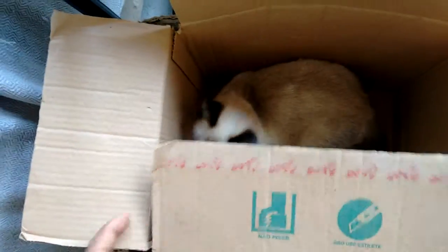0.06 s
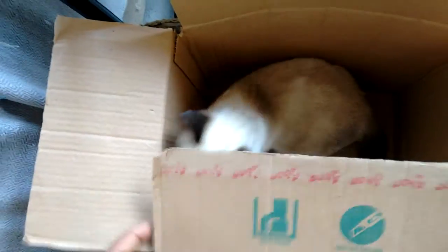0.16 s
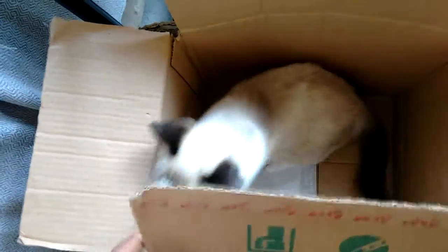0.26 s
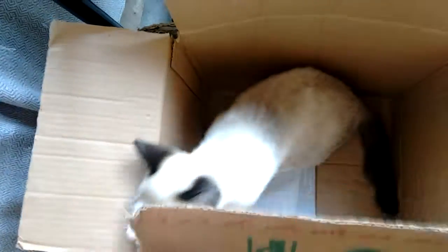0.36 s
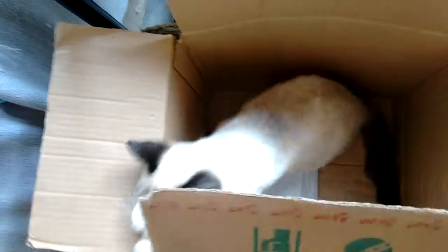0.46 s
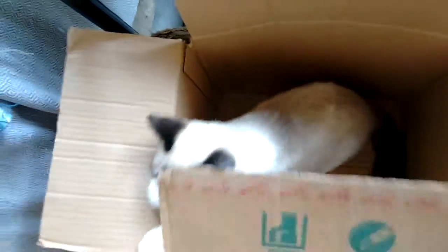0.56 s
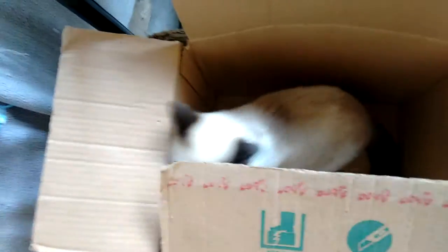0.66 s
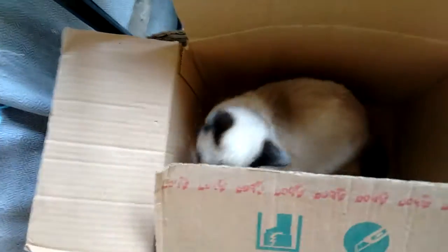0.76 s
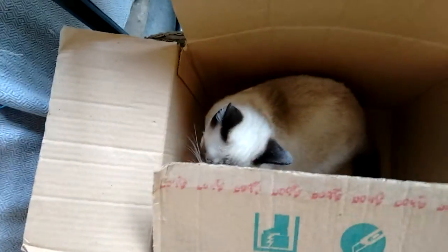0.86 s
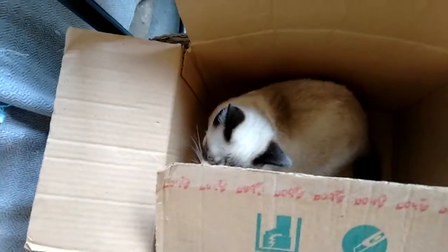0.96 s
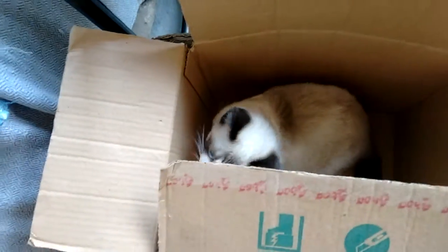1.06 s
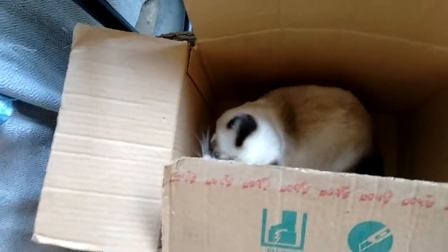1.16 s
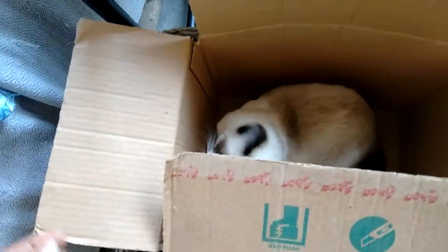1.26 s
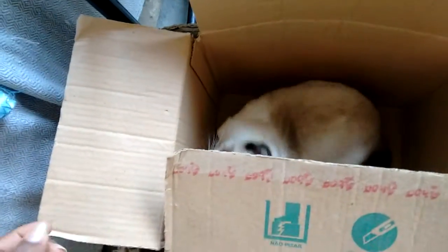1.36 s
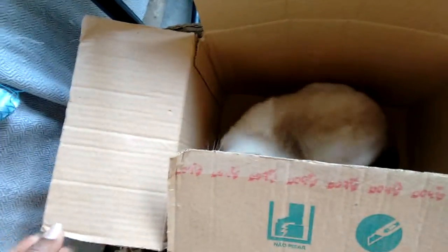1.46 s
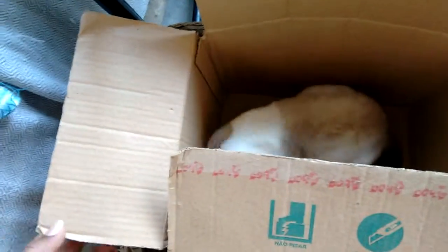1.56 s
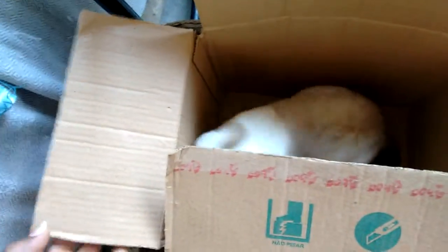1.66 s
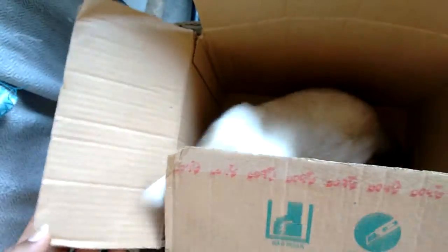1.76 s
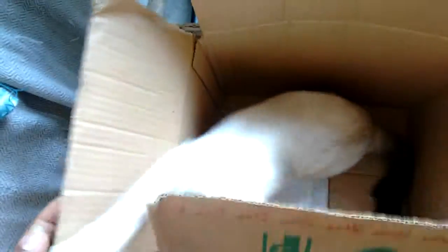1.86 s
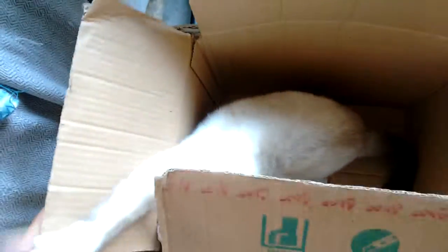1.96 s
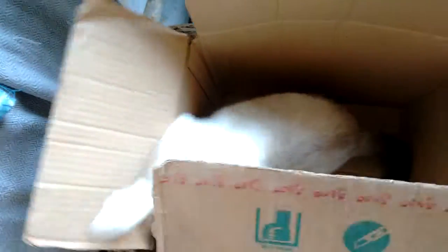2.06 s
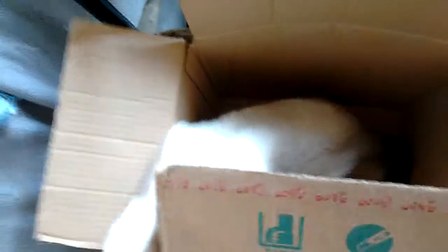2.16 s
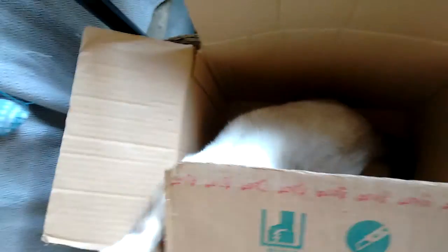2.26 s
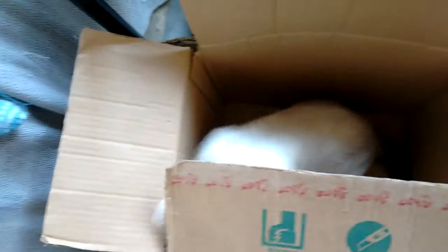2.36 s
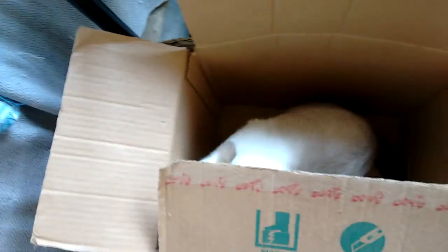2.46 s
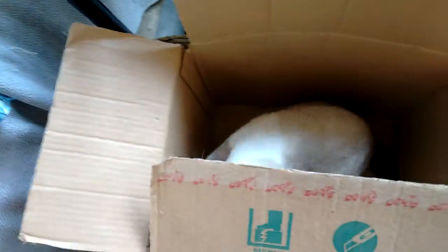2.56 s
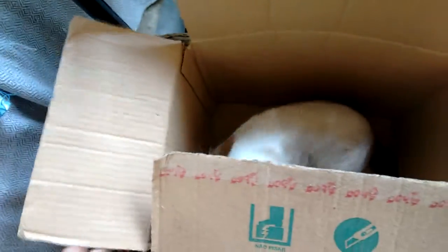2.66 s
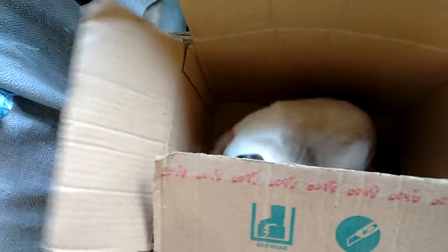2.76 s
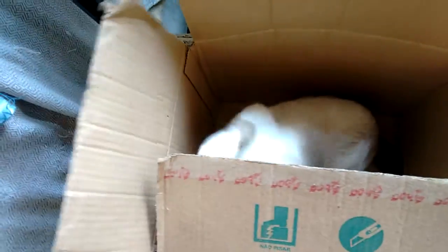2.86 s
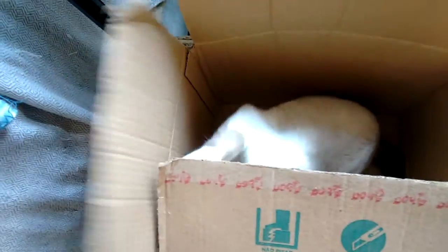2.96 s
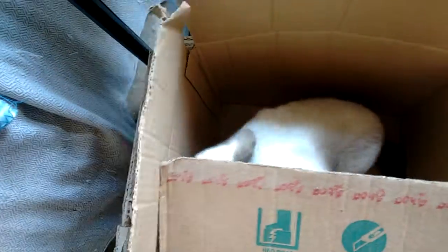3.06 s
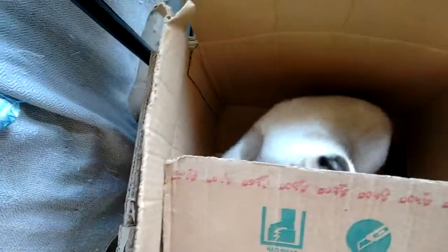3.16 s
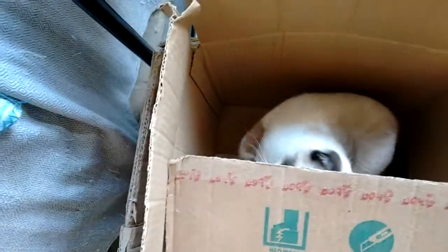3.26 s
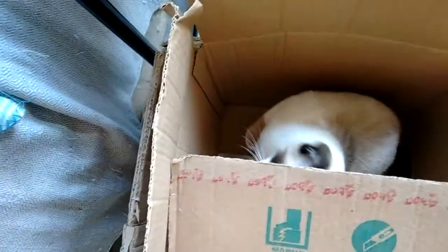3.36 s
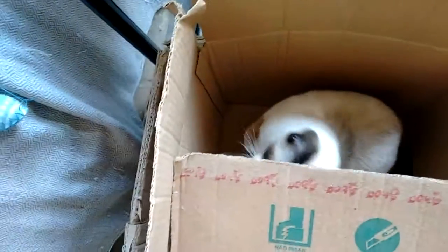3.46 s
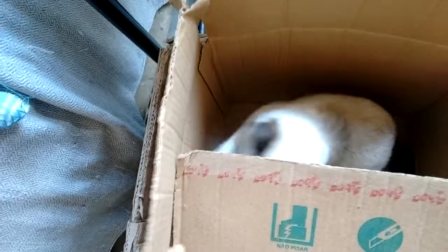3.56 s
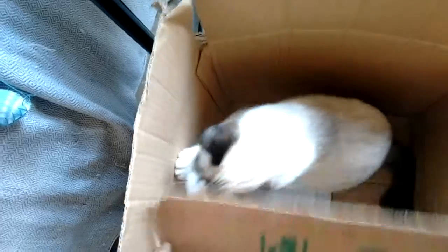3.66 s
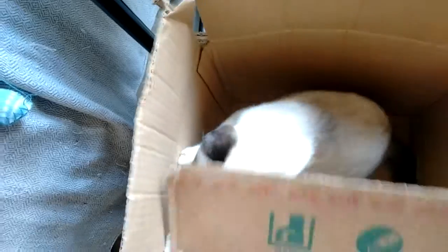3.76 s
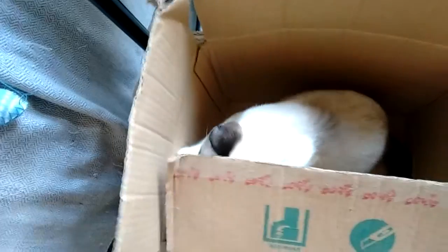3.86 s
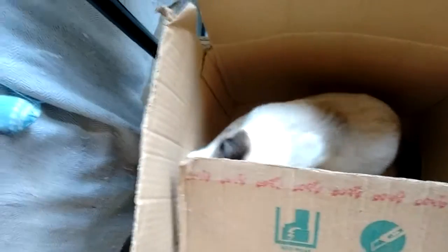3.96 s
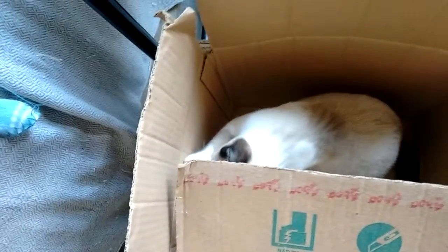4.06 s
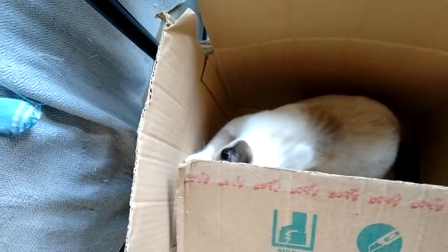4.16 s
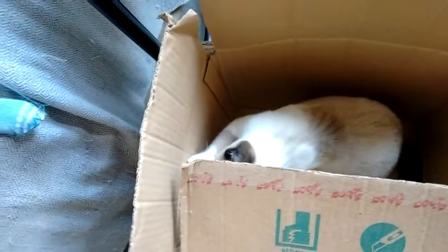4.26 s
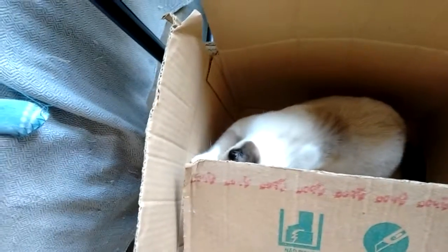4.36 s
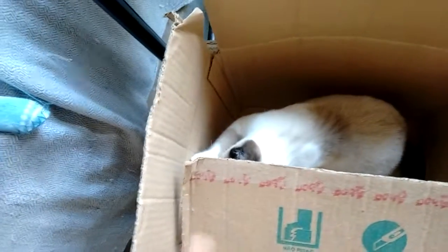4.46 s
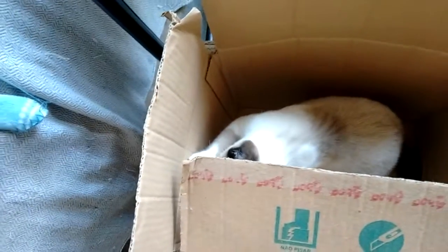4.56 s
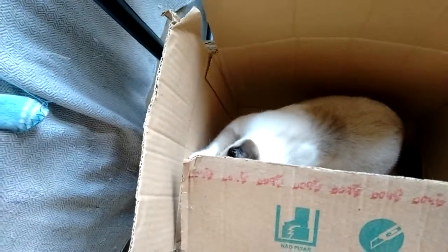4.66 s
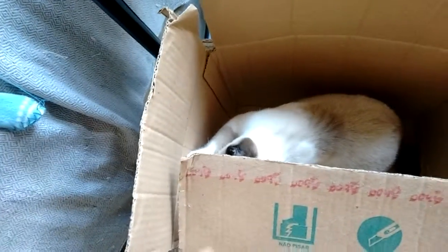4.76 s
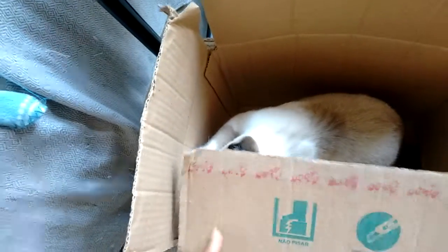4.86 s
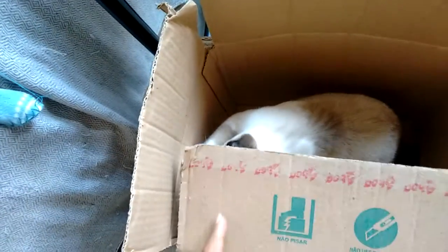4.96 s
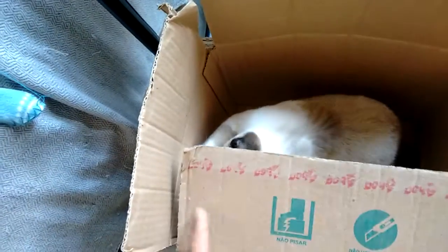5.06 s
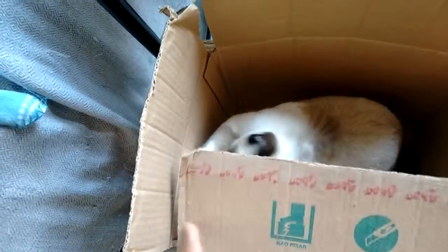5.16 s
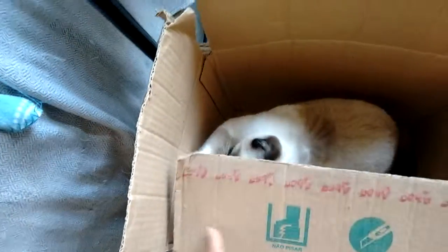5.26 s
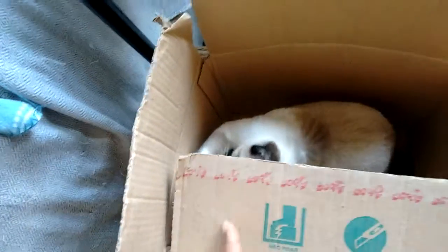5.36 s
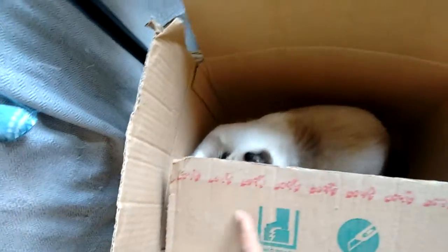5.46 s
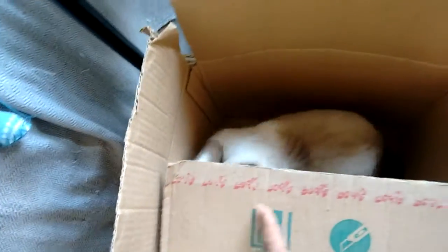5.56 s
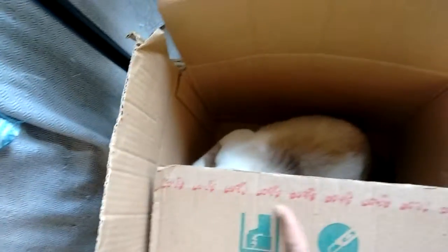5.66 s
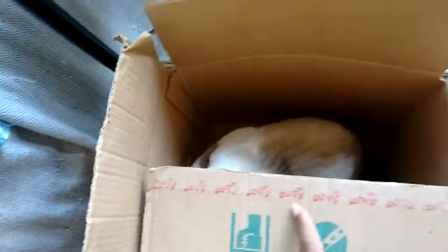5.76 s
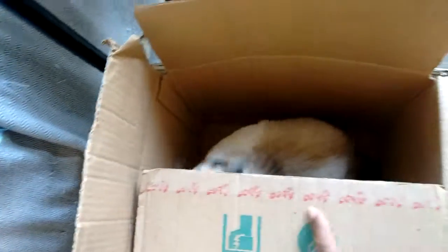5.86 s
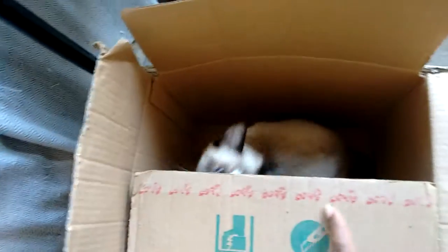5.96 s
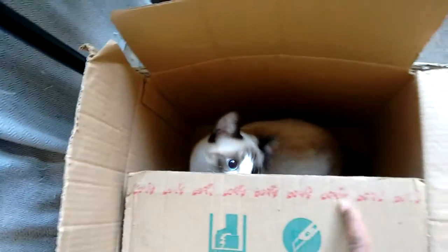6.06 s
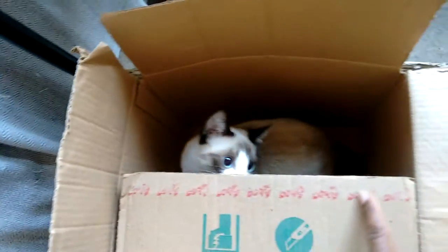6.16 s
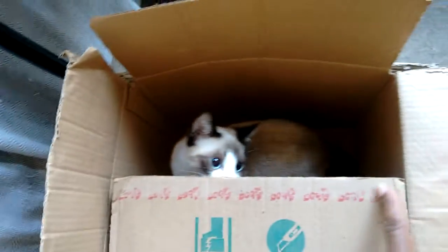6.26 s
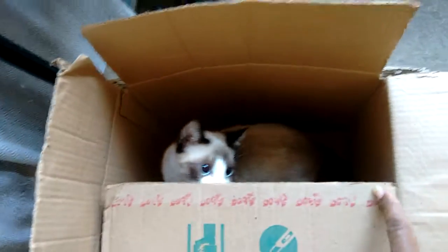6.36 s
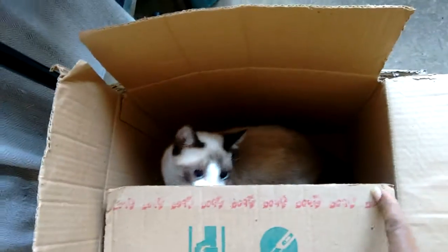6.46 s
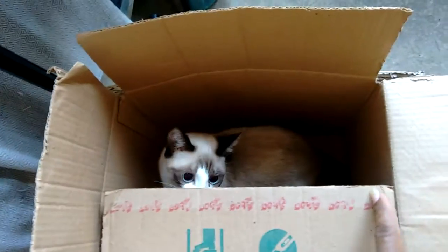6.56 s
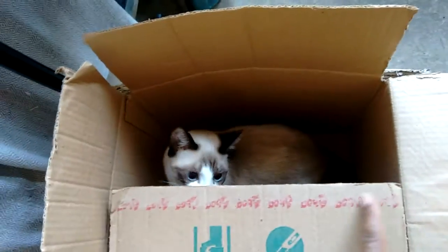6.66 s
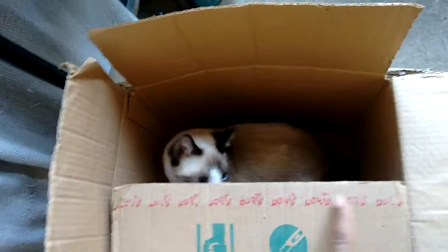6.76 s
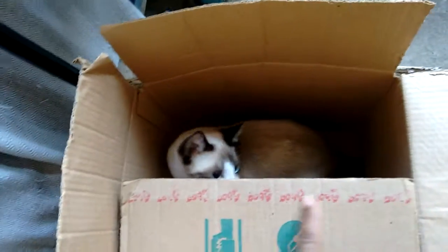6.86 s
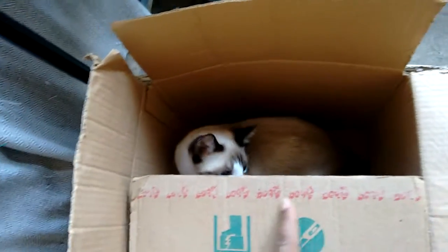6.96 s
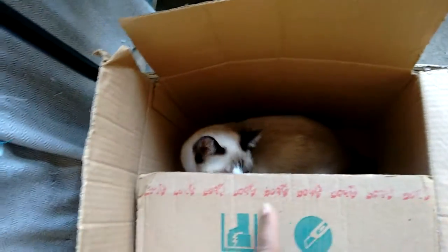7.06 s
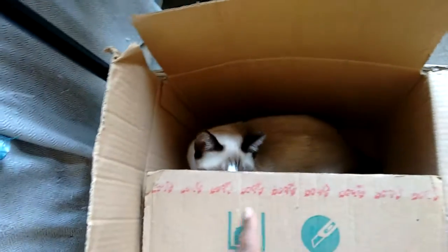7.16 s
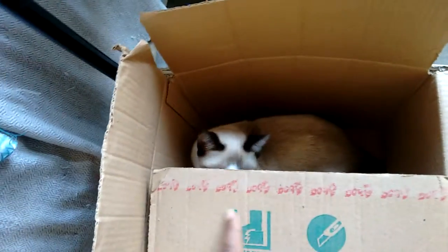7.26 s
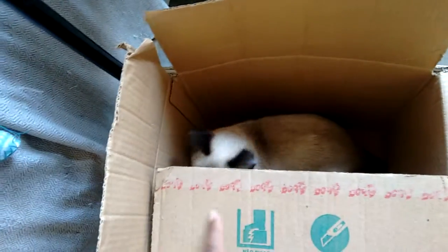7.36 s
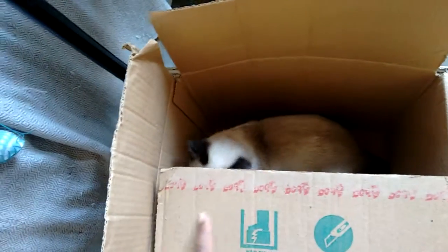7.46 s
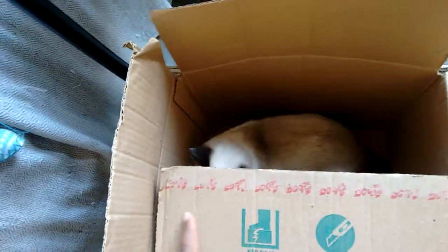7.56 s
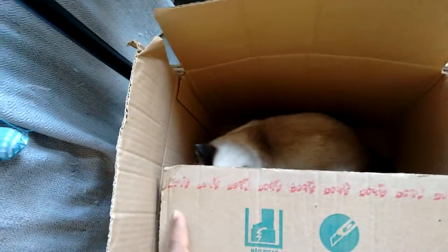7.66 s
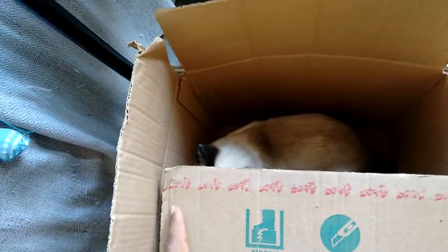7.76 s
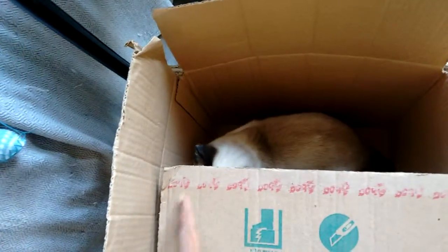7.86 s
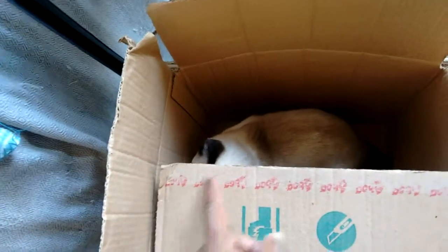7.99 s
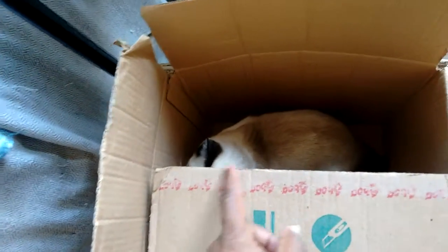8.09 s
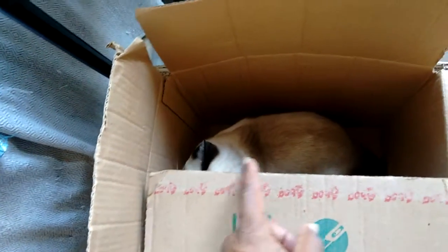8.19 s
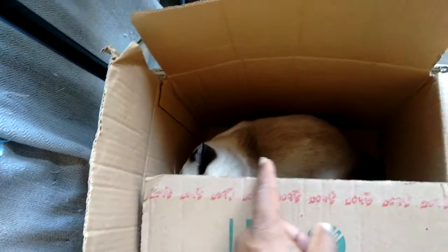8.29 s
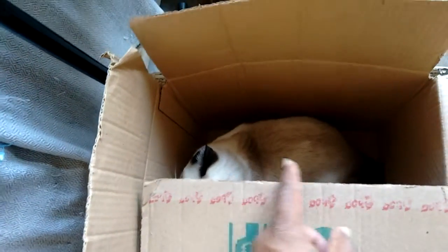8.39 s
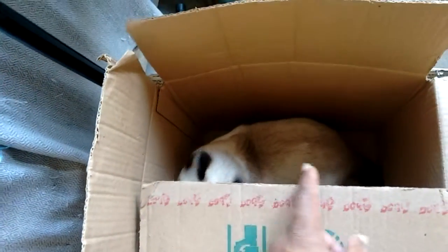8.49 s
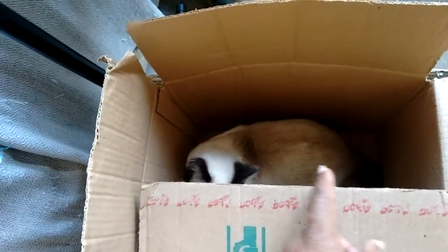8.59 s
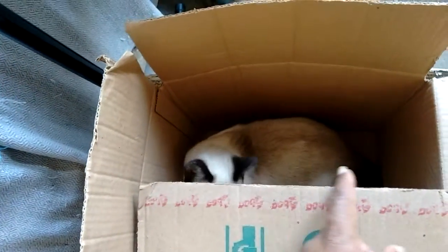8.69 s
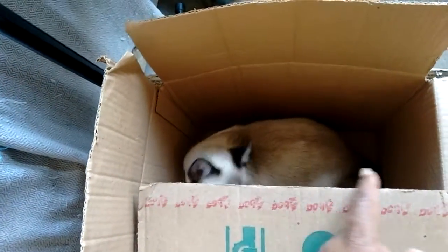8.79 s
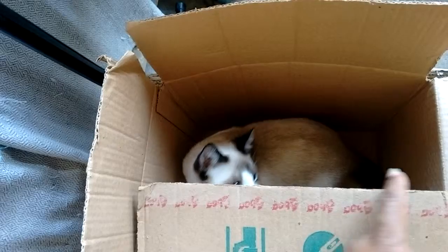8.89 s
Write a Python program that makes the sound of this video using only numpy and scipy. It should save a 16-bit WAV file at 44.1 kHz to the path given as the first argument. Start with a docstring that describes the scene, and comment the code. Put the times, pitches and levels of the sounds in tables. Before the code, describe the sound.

Faint room tone and a bird chirp open the scene, with quick boxy bumps as a cat moves in a cardboard box. Scattered paw scuffs and thumps continue, then a lull. A finger lands on the flap with rapid scratchy flicks, then rubs in long rasping strokes with little ticks and snaps, fading to a light rub under thin bird whistles. Heard very near.

```python
"""Over faint room tone, birds call from the start: gliding, trembling sines with an outdoor echo.
Until 4.6 s a cat scuffs and paws in an open cardboard box: friction and blows ring its modes.
From 4.9 s a fingertip lands and flicks; from 5.3 s it drags along a flap, catching and jerking free.
Corrugation ridges and plucked fibres roughen the rub; thin whistles return near the end.
A hand-held two-port microphone hears it from close by."""
import sys
import numpy as np
from scipy import signal
from scipy.fft import rfft, irfft
from scipy.io import wavfile
from scipy.ndimage import uniform_filter1d

SR = 44100
rng = np.random.default_rng(int(sys.argv[2]) if len(sys.argv) > 2 else 0)


def file_out(sig):
    """Save sig as 16-bit WAV at sys.argv[1]."""
    # one column per channel
    cols = np.atleast_2d(sig).T
    # limit, then scale
    lim = np.clip(cols, -1, 1)
    pcm = np.round(lim * 32767).astype(np.int16)
    wavfile.write(sys.argv[1], SR, pcm)


N = 393813  # samples

# room tone spectrum [f/Hz, relative density/dB per Hz]
ROOM_TONE = [(20, -20.5), (63, -4), (100, -15), (700, -6.5), (1100, -10), (1900, -18.5), (2800, -20.5),
             (4200, -18.5), (5000, -24.5), (8000, -23), (12000, -32), (15700, -35)]
# single notes and far thin whistles [t/s, length/s, from f/Hz, to f/Hz, level/dB]
WHISTLES = [(0, .025, 3000, 2980, -47), (.02, .055, 3120, 3060, -54), (.04, .03, 1970, 1950, -52),
            (6.405, .022, 2550, 2430, -50), (.74, .08, 4200, 4050, -64), (.82, .12, 4480, 4420, -65),
            (.93, .13, 4400, 4050, -65), (1.1, 0.1, 3070, 3090, -61), (1.36, .24, 4100, 3500, -63),
            (3.2, .1, 3420, 3410, -66), (3.37, .05, 4220, 4050, -64), (3.425, .065, 4000, 3930, -63),
            (8.6, .06, 4070, 4030, -65), (8.655, .08, 4020, 3620, -61), (8.655, .06, 4200, 4350, -62),
            (8.74, .11, 4290, 4160, -63)]
# near bird's phrase [t into phrase/s, length/s, from f/Hz, to f/Hz, level before phrase level/dB]
WARBLES = [(.02, 0.046, 2773, 3150, -54.5), (.035, 0.048, 3920, 3900, -53.5), (.07, 0.063, 2520, 2150, -42),
           (.065, 0.074, 2030, 2136, -50), (.115, 0.0288, 3850, 3240, -49),
           (.118, 0.048, 3200, 2960, -49.5), (.13, 0.03, 2490, 2400, -43), (.145, 0.069, 1667, 2000, -53.5),
           (0.182, 0.026, 2430, 2480, -39), (0.203, 0.025, 3027, 2933, -45.5),
           (.21, 0.067, 2544, 2260, -39.5), (.215, 0.071, 2720, 2530, -48.5), (.17, .07, 2050, 1970, -59)]
# phrase starts; a start before 0 leaves only the phrase's end [t/s, level/dB]
PHRASE_STARTS = [(-0.198, -5), (1.69, 3), (6.395, 1)]
# fur and paws scuffing the walls [t/s, length/s, hiss level/dB, hollow level/dB, panel level/dB]
SCUFFS = [(.05, 0.11, -54, -37, -43), (.18, 0.034, -45, -35.5, -38), (.25, 0.068, -42.5, -31.5, -50),
          (.385, 0.033, -47, -40, -43.5), (.46, 0.25, -58, -63, -83), (.65, 0.032, -51, -67, -83),
          (.72, 0.17, -62, -71, -91), (1.515, 0.034, -56.5, -41, -44), (1.75, 0.13, -55.5, -45, -71),
          (1.85, 0.049, -50, -42.5, -51), (1.91, 0.068, -58, -43, -48.5), (1.96, 0.15, -46, -45.5, -46.5),
          (2.12, 0.078, -59.5, -64, -63), (2.205, 0.072, -51, -50, -52.5), (2.3, 0.13, -56, -50, -75),
          (2.385, 0.11, -51, -51, -57), (2.515, 0.044, -49, -66, -47), (2.58, 0.078, -64, -64, -57),
          (2.73, 0.08, -47.5, -45.5, -47.5), (2.83, .2, -50.5, -59, -82), (3.075, 0.072, -62, -40, -48),
          (3.15, 0.076, -56, -59, -63), (3.53, 0.049, -54.5, -41.5, -55), (3.63, 0.091, -42.5, -42.5, -41),
          (3.74, 0.065, -46, -39.5, -36.5), (3.865, 0.061, -49.5, -46, -55), (4.0, 0.14, -55.5, -61, -66),
          (4.4, 0.22, -61, -65, -64)]
# fingertip landing and flicking [t/s, length/s, hiss level/dB, hollow level/dB, panel level/dB]
FLICKS = [(4.908, 0.068, -61, -32, -44), (4.975, 0.078, -56, -34.5, -33), (5.065, 0.083, -49.5, -28.5, -35),
          (5.15, 0.055, -46.5, -36.5, -39), (5.22, 0.056, -59.5, -35.5, -44),
          (5.265, 0.035, -48.5, -37, -36)]
# long drags, one sub-table each [t/s, hiss level/dB, hollow level/dB, panel level/dB, flute level/dB]
DRAGS = [
    [(5.345, -65, -26, -47, -51), (5.351, -54, -40.5, -44, -42.5), (5.531, -48, -33.5, -28.5, -35.5),
     (5.561, -43.5, -37.5, -31, -40), (5.751, -43, -42, -34, -39), (5.837, -48, -49, -37.5, -46.5),
     (5.899, -44.5, -39, -34, -43), (6.087, -49, -48.5, -41.5, -46.5), (6.181, -43.5, -39, -39.5, -41.5),
     (6.373, -50.5, -35, -40.5, -51), (6.43, -74, -80, -98, -53)],
    [(6.66, -73, -53, -60, -66), (6.682, -68, -36, -43.5, -69), (6.706, -55.5, -36.5, -32, -50.5),
     (6.824, -48, -32.5, -33.5, -37), (6.862, -45, -31.5, -31, -36), (6.966, -43, -32, -32, -35),
     (7.104, -48, -36, -27, -35), (7.438, -50.5, -35.5, -27.5, -38.5), (7.698, -52.5, -31, -33, -36.5),
     (7.818, -60, -37.5, -53, -61), (7.87, -66, -55, -45, -58)],
    [(7.88, -78, -43, -45, -58), (7.914, -48.5, -39.5, -40, -49), (7.964, -43, -40.5, -36, -39.5),
     (8.142, -48, -34, -38, -43.5), (8.2, -53, -45.5, -49.5, -55), (8.39, -53.5, -53, -49.5, -53.5),
     (8.564, -55.5, -61, -57, -75), (8.8, -57.5, -44.5, -54, -75), (8.93, -58, -60, -69, -72)],
]
# narrow hollow scrape along a flap edge [t/s, length/s, level/dB]
RASPS = [(2.36, 0.31, -48.5), (2.73, 0.069, -53), (8.1, 0.058, -32), (8.19, 0.29, -52)]
# paw, flap and fingertip blows [t/s, hollow peak/dB, panel peak/dB, crack level/dB, thump peak/dB]
BLOWS = [(0.057,-22.5,-27.5,-41.5,-36),(0.098,-13,-19.5,-37,-28),(0.13,-54,-34,-42.5,-52),(0.254,-11.5,-7,-25,-13.5),(0.396,-33,-38,-43,-27),
         (0.543,-33.5,-50,-70,-49),(0.581,-27.5,-54,-55,-28.5),(1.524,-30.5,-31,-40.5,-29),(1.727,-34.5,-32.5,-38.5,-29.5),(1.819,-42,-39,-47,-43),(1.856,-33.5,-49,-42,-40),
         (1.965,-25,-26,-36,-30),(1.980,-27,-18.5,-22,-18),(2.331,-40,-60,-63,-36),(2.4,-38,-40,-60,-37),(2.728,-42,-38,-46,-37.5),(3.080,-27,-23.5,-34,-18.5),(3.09,-11.5,-32,-60,-16),
         (3.102,-21.5,-42,-32.5,-19),(3.654,-48,-36,-41,-50),(3.672,-16.5,-21.5,-24,-23),(3.765,-25.5,-25,-37,-59),(3.783,-25.5,-29,-46,-36),(3.932,-52,-52,-36.5,-32),(4.908,-24,-26,-44,-26),
         (4.982,-25,-48,-66,-27),(5.351,-29.5,-31,-61,-57),(7.896,-49,-42,-60,-55),(8.774,-42,-53,-63,-58)]
# dragging fingertip catches and jerks free [t/s, panel peak/dB, crack level/dB]
CATCHES = [(5.070,-21.5,-50),(5.435,-26,-58),(5.609,-22,-38),(5.635,-38,-35),(5.847,-24,-51),(5.906,-16.5,-47),(6.055,-25,-33.5),(7.071,-16.5,-52),(7.086,-22,-54),
           (7.107,-22,-36),(7.123,-17,-29.5),(7.236,-21,-49),(7.263,-18.5,-52),(7.307,-18,-35),(7.327,-15.5,-36),(7.373,-22,-56),(7.439,-21,-48),(7.457,-20,-40),(7.707,-30,-43),(7.982,-32,-38)]
# box modes: hollow, panels, whole-box thump, flutes, flap edge
# [f/Hz, width before struck damping/Hz, relative level/dB]
HOLLOW = [(291.7, 16.3, -0.5), (305.3, 26.4, 4), (327.5, 48, 4), (374.2, 20.2, -4.5)]
PANEL = [(659.5, 47, -5), (722.4, 87, 4.5), (822, 74.6, 4.5), (927, 73, 1)]
THUMP = [(35.8, 28, -13), (63, 12, -8), (99.3, 45, -4), (165, 80, 1), (605, 330, 0)]
FLUTES = [(1310, 143, 2.2), (1395, 410, 12.1), (1967, 183, 8.5), (2214, 193, 9.1), (2940, 1000, 0.73)]
EDGE = [(1210, 200, 0)]
# fibres tearing past skin and fur [f/Hz, relative density/dB per Hz]
HISS = [(700, 4.5), (1600, 2), (2800, 5), (4200, 1.5), (6500, -1), (9000, 2.5), (12000, -1), (15700, -5)]
# left port against right [f/Hz, likeness/0-1, level/dB]
PORTS = [(25, 1, -4), (125, 0.48, -1), (287, 0.89, 0), (1310, 1, -1), (1770, 0.4, -3), (2240, 0.98, -2.5),
         (3230, 0.87, -3), (7000, 0.56, -3.5), (7900, 0.45, -1), (10300, 0.53, -8), (12200, 0.6, -14),
         (15800, 0.5, -9)]
# delay of left port behind right [f/Hz, lag/cycles]
LAG = [(0, 0), (1050, 0), (1550, .15), (2300, .5), (3450, 1.04), (6000, 2.03), (10000, 3.7), (15500, 5.6)]

ROOM_TONE_DB, ECHO_DB, EDGE_HZ = -52, -15, 15620
WARBLE_WAVER, WHISTLE_WAVER = .011, .008  # rms share by which pitch trembles
BREATH_SHARE, OUTDOOR_T60_S = .35, .2
SCUFF_RISE_S, FLICK_RISE_S, SCUFF_FALL_S, FLICK_FALL_S = 0.025, 0.0089, 0.022, 0.0075
SAG_DB = -3  # a rub weakens as it slows
FLICK_FLUTE_DB, SCUFF_FLUTE_DB = 4, -3.5  # flutes against midway between hiss and panel
JUDDER_DB, PATCH_DB = 1.0, 1.6  # unevenness of the grip; blotchiness of the hiss
RIDGES_PER_S, RIDGE_UNEVEN_SHARE, RIDGE_DB = 52, .45, 6  # skin bumping over the corrugation
RIDGE_FALL_SHARE = .35  # decay constant, share of a ridge gap
GRIT_PER_S, GRIT_DB, GRIT_SPREAD_DB = 1400, -11, 2.6  # level is against the flutes
GRIT_LOW_HZ, GRIT_HIGH_HZ, GRIT_WIDTH_HZ = 2400, 5600, 300
ROCK_DB, ROCK_FALL_S, ROCK_REST_DB = -10., 0.058, -77  # first is against the scuffs' hollow level
STRUCK_DAMPING = 1.8  # width factor: paw or flap stays on the wall
SPOT_DB, STRUCK_FLUTE_DB = 1.8, -18  # mode spread with the spot struck; flutes in a blow
BLOW_RISE_S = 0.0026  # soft paw or flap builds its force
BOUNCE_GAIN, BOUNCE_FALL_S, CRACK_RISE_S = .65, .013, .005
CATCH_HOLLOW_DB = -29  # against the catch's panel level


def gain_of(db):
    """Decibels to amplitude."""
    return 10 ** (np.asarray(db) / 20)


def evened(x):
    """Scales to rms 1."""
    return x / np.sqrt(np.mean(x ** 2) + 1e-20)


def smooth_noise(size):
    """Noise averaged over size samples, rms 1."""
    return evened(uniform_filter1d(rng.standard_normal(N), size))


def wander(size, db):
    """Gain drifting at random over about size samples."""
    noise = uniform_filter1d(rng.standard_normal(N), size)
    return gain_of(db * evened(uniform_filter1d(noise, size)))


def coloured(x, points):
    """Filters the last axis by an [f/Hz, dB] spectrum."""
    hz, db = np.transpose(points)
    f = np.fft.rfftfreq(N, 1 / SR)
    return irfft(rfft(x) * gain_of(np.interp(np.log(f + 1), np.log(hz + 1), db)), N)


def tail(t60_s):
    """Diffuse echo: exponentially dying noise per channel, energy 1."""
    t = np.arange(SR // 2) / SR
    taps = rng.standard_normal((2, len(t))) * gain_of(-60 * t / t60_s) * (t > .004)
    return taps / np.linalg.norm(taps, axis=1, keepdims=True)


def room_tone():
    """Steady coloured noise in four unrelated versions, drifting slightly in level."""
    air = gain_of(ROOM_TONE_DB) * evened(coloured(rng.standard_normal((4, N)), ROOM_TONE))
    return air * gain_of(0.11 * smooth_noise(6000))


def sung(notes, waver):
    """Gliding sine notes whose pitch trembles at random."""
    out, tremble = np.zeros(N), 1 + waver * smooth_noise(200)
    for s, length, from_hz, to_hz, db in notes:
        t, at = np.arange(0, length, 1 / SR), round(s * SR)
        hz = np.linspace(from_hz, to_hz, len(t)) * tremble[at:at + len(t)]
        note = np.sin(2 * np.pi * np.cumsum(hz) / SR) * signal.windows.tukey(len(t), .35)
        out[at:at + len(t)] += gain_of(db) * note
    return out


def birds():
    """Rough warbled phrase and thin clean whistles, with a diffuse outdoor echo."""
    phrases = [(start + s, *rest, db + phrase_db)
               for start, phrase_db in PHRASE_STARTS
               for s, *rest, db in WARBLES if start + s > 0]
    whistle = sung(WHISTLES, WHISTLE_WAVER) * wander(size=600, db=2.5)
    warble = sung(phrases, WARBLE_WAVER) * wander(size=200, db=2.5)
    warble = warble * (1 + BREATH_SHARE * smooth_noise(40))
    echo = signal.fftconvolve((warble + whistle)[None], tail(OUTDOOR_T60_S), axes=1)[:, :N]
    return np.array([0.9 * warble + whistle + 0.77 * echo[0], 1.5 * echo[1]])


def mode(hz, width_hz, db):
    """One mode that builds up and dies, with steep skirts; energy set by db."""
    t = np.arange(SR // 4) / SR
    x = t * np.exp(-np.pi * width_hz * t) * np.sin(2 * np.pi * hz * t)
    return gain_of(db) * x / np.linalg.norm(x)


def rung(force, modes, drift_db):
    """A running force rings the modes; as the contact moves, each gains and loses."""
    total = np.linalg.norm(gain_of(np.array(modes)[:, 2]))
    out = 0
    for m in modes:
        drive = force * wander(size=2500, db=drift_db)
        out = out + signal.oaconvolve(drive, mode(*m)[None], axes=1)[:, :N]
    return out / total


def rubs(rows, rise_s, fall_s):
    """Gain of separate rubs, one line per dB column: rise, sagging hold, release."""
    out = np.zeros((len(rows[0]) - 2, N + SR))
    for s, length, *dbs in rows:
        t = np.arange(0, length + 6 * fall_s, 1 / SR)
        rise = np.sin(np.pi / 2 * np.minimum(t / min(rise_s, length / 2), 1)) ** 2
        sag = gain_of(SAG_DB * np.minimum(t / length, 1))
        release = np.exp(-np.maximum(t - length, 0) / fall_s)
        out[:, round(s * SR):][:, :len(t)] += gain_of(dbs)[:, None] * rise * sag * release
    return out[:, :N]


def rocking():
    """The box rocks under the scuffs and settles to a faint rest level: noise rings the thump modes."""
    sway = gain_of(ROCK_DB) * rubs(SCUFFS, SCUFF_RISE_S, ROCK_FALL_S)[1] + gain_of(ROCK_REST_DB)
    return rung(rng.standard_normal((2, N)) * sway, THUMP, drift_db=3.0)


def slips(per_s, spread_db, smooth):
    """Stick-slip force in two versions: uneven clicks at shared times, plus unrelated smooth noise."""
    size = gain_of(spread_db * np.minimum(rng.exponential(1, N), 4)) * (rng.random(N) < per_s / SR)
    clicks = evened(size * rng.choice([-1., 1.], (2, N)))
    return evened(clicks + smooth * rng.standard_normal((2, N)))


def ridges():
    """Gain that jumps at each corrugation ridge and fades until the next."""
    speed = 1 + RIDGE_UNEVEN_SHARE * smooth_noise(900)
    passed = np.cumsum(RIDGES_PER_S * abs(speed)) / SR
    bumps = np.exp(-(passed % 1) / RIDGE_FALL_SHARE)
    return evened(gain_of(RIDGE_DB * uniform_filter1d(bumps, size=60)))


def patchy(x, db):
    """Gives a hiss random patches over time and pitch."""
    z = signal.stft(x, nperseg=512)[2]
    patches = uniform_filter1d(rng.standard_normal(z.shape[1:]), size=14, axis=0)
    patches = uniform_filter1d(patches, size=14, axis=1)
    return signal.istft(z * gain_of(db * evened(patches)), nperseg=512)[1][:, :N]


def fibre_hiss(grip):
    """Fibres tear past skin and fur: slips coloured and patched, rms 1 above 4.5 kHz."""
    hiss = coloured(slips(per_s=1500., spread_db=-1.0, smooth=3.1), HISS) * grip ** 0.89
    hiss = patchy(hiss, db=PATCH_DB)
    treble = signal.sosfilt(signal.butter(4, 4500, "high", fs=SR, output="sos"), hiss)
    return hiss / treble.std()


def grit():
    """Plucked fibres, each a short ring at one of 12 pitches, in two unrelated versions."""
    size = gain_of(GRIT_SPREAD_DB * np.minimum(rng.exponential(1, (2, N)), 4))
    size = size * (rng.random((2, N)) < GRIT_PER_S / SR)
    pitches_hz = np.geomspace(GRIT_LOW_HZ, GRIT_HIGH_HZ, 12)
    which = rng.integers(0, len(pitches_hz), (2, N))
    out = np.zeros((2, N))
    for k, hz in enumerate(pitches_hz):
        ring = mode(hz, GRIT_WIDTH_HZ, 0)[None, :2000]
        out += signal.oaconvolve(size * (which == k), ring, axes=1)[:, :N]
    return evened(out)


def level(tables, column):
    """Gain over time from tables of rows, silent between them."""
    t, out = np.arange(N) / SR, np.zeros(N)
    for rows in tables:
        rows = np.array(rows)
        out += gain_of(np.interp(t, rows[:, 0], rows[:, column], -150, -150))
    return uniform_filter1d(out, size=150)


def friction():
    """One slipping force rings hollow, panels, flutes and flap edge; fibres hiss and pluck; the box rocks."""
    grip = wander(size=200, db=JUDDER_DB) * ridges()
    force = slips(per_s=900., spread_db=2.0, smooth=0.64) * grip
    cat = rubs(SCUFFS, SCUFF_RISE_S, SCUFF_FALL_S)
    flicks = rubs(FLICKS, FLICK_RISE_S, FLICK_FALL_S)
    drags = np.array([level(DRAGS, column=k) for k in (1, 2, 3, 4)])
    fibres, hollow, panel = cat + flicks + drags[:3]
    flutes = drags[3] + gain_of(SCUFF_FLUTE_DB) * np.sqrt(cat[0] * cat[2])
    flutes = flutes + gain_of(FLICK_FLUTE_DB) * np.sqrt(flicks[0] * flicks[2])
    body = rung(force * hollow, HOLLOW, drift_db=1.6)
    body += rung(force * panel, PANEL, drift_db=1.6)
    body += rung(force * flutes, FLUTES, drift_db=1.6)
    body += gain_of(GRIT_DB) * grit() * grip * flutes
    body += rung(force * rubs(RASPS, SCUFF_RISE_S, SCUFF_FALL_S)[0], EDGE, drift_db=-1.5)
    return body + rocking() + fibre_hiss(grip) * fibres


def blows():
    """Each blow rings the box modes in shares of its own, bounces a little and cracks the fibres."""
    body, crack, t = np.zeros(N + SR), np.zeros(N + SR), np.arange(SR // 10) / SR
    crack_shape = np.exp(-t / 0.0051) + 0.59 * np.exp(-t / 0.0094)
    crack_shape = crack_shape * (1 - np.exp(-t / CRACK_RISE_S))  # fibres give way
    panel_and_flutes = PANEL + [(f, w, d + STRUCK_FLUTE_DB) for f, w, d in FLUTES]
    rows = BLOWS + [(s, db + CATCH_HOLLOW_DB, db, crack_db, -np.inf) for s, db, crack_db in CATCHES]
    for s, hollow_db, panel_db, crack_db, thump_db in rows:
        at = round(s * SR)
        place, size = rng.integers(150, 2600, 8), rng.uniform(-1.12, 1, 8)
        bounces = np.zeros(2600)
        bounces[place] = BOUNCE_GAIN * size * np.exp(-place / SR / BOUNCE_FALL_S)
        bounces[0] = 1
        for modes, db in ((HOLLOW, hollow_db), (panel_and_flutes, panel_db), (THUMP, thump_db)):
            x = sum(mode(f * rng.normal(1, 0.04), STRUCK_DAMPING * w, d + rng.normal(0, SPOT_DB))
                    for f, w, d in modes)
            x = x * np.minimum(np.arange(len(x)) / SR / BLOW_RISE_S, 1)
            x = signal.fftconvolve(x, bounces)
            body[at:at + len(x)] += gain_of(db) * x / abs(x).max()
        crack[at:at + len(t)] += gain_of(crack_db) * crack_shape
    scattered = signal.fftconvolve(body, tail(t60_s=0.11)[1])
    fibres = evened(coloured(rng.standard_normal((2, N)), HISS))
    return np.array([body[:N], scattered[:N]]) + crack[:N] * fibres


def ports(x, unlike):
    """Left port hears the sound later, duller and partly replaced by an unrelated version."""
    f = np.fft.rfftfreq(N, 1 / SR)
    hz, *columns = np.transpose(PORTS)
    same, db = (np.interp(f, hz, c) for c in columns)
    same, cycles = np.clip(same, 0, 1), np.interp(f, *np.transpose(LAG))
    right = rfft(x)
    left = same * np.exp(-2j * np.pi * cycles) * right + np.sqrt(1 - same ** 2) * rfft(unlike)
    return np.array([irfft(left * gain_of(db / 2), N), irfft(right / gain_of(db / 2), N)])


def scene():
    """Room tone, birds, box and the room's echo; each as the sound and an alternate version of it."""
    air = room_tone()
    outdoors = birds()
    near = friction() + blows()
    near = near + gain_of(ECHO_DB) * signal.fftconvolve(near, tail(t60_s=0.28), axes=1)[:, :N]
    # room tone that reaches each port on its own
    diffuse = coloured(air[2:], [(20, 4.5), (400, 4.5), (1100, -17.0), (15700, -44)])
    return ports(*(near + outdoors + 0.73 * air[:2])) + diffuse


def record(dry):
    """Linear-phase low-pass: the microphone's band limit."""
    taps = signal.firwin(511, EDGE_HZ, window=("kaiser", 9), fs=SR)
    return signal.oaconvolve(dry, taps[None], "same")


dry = scene()
out = record(dry)
file_out(out)
```